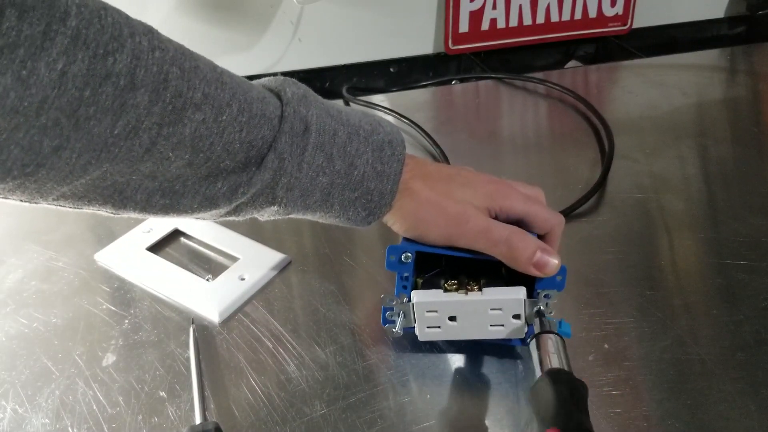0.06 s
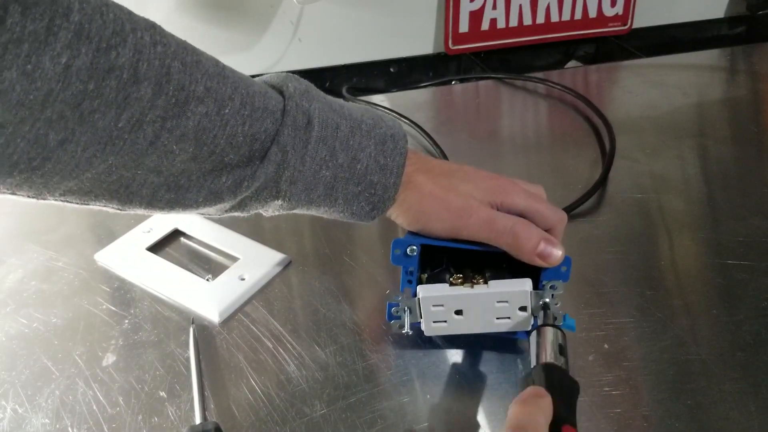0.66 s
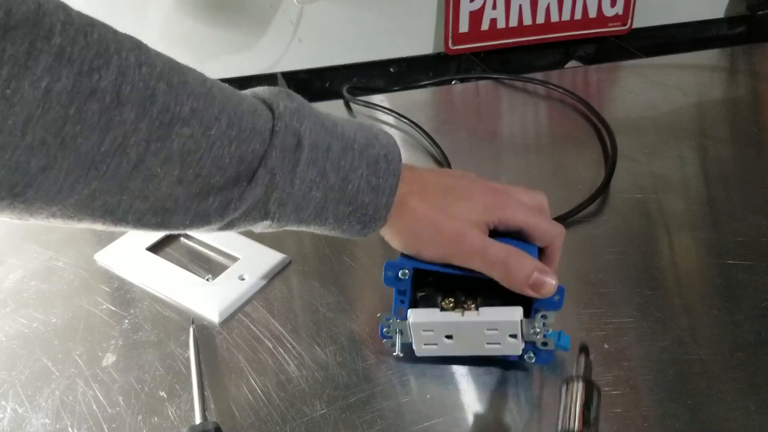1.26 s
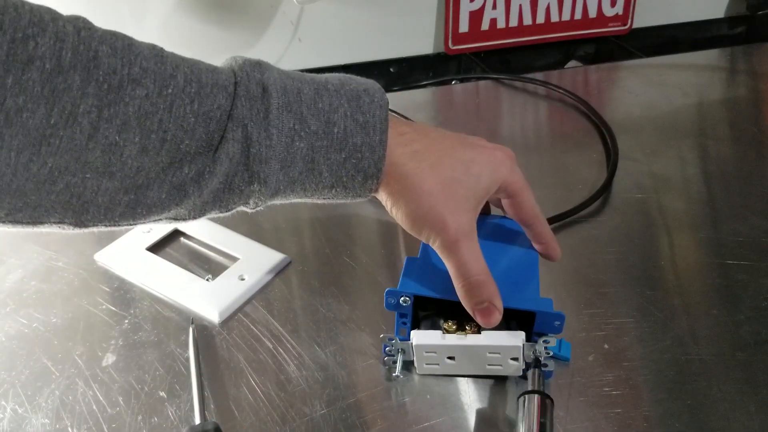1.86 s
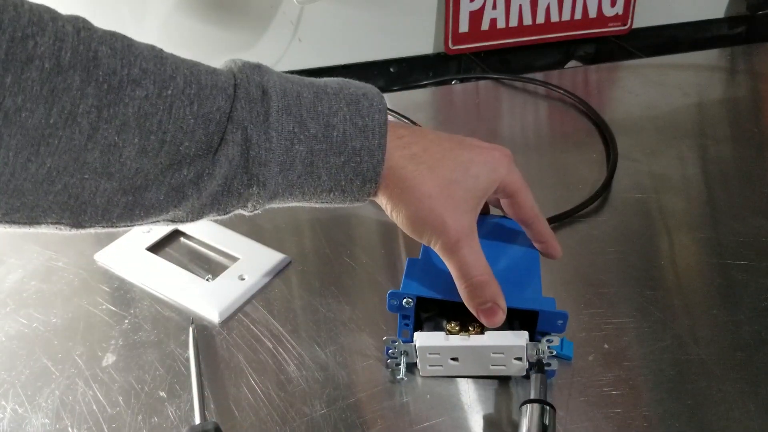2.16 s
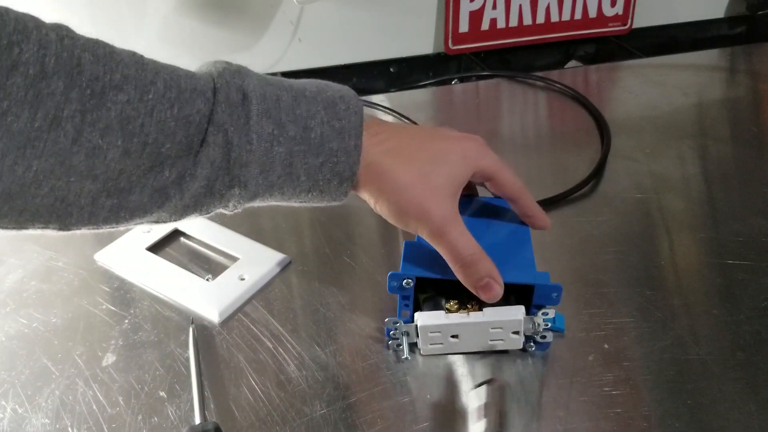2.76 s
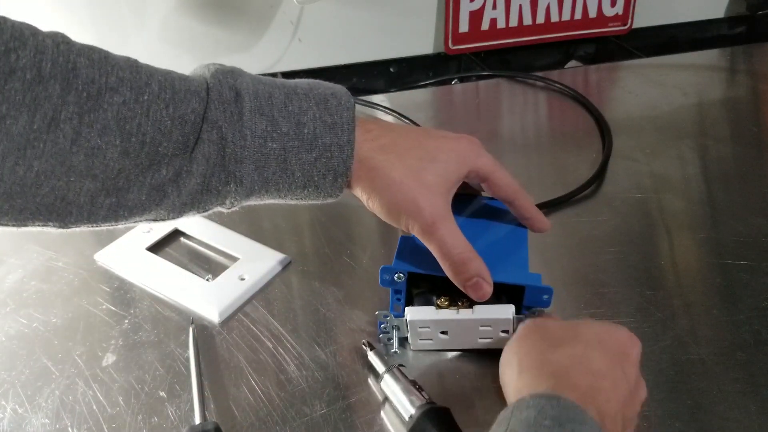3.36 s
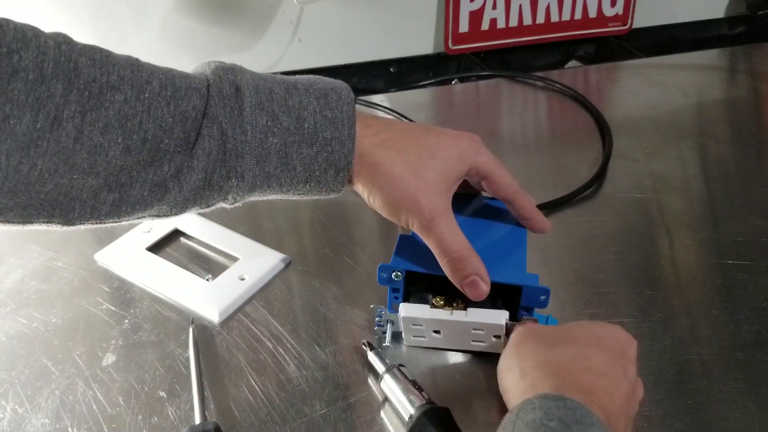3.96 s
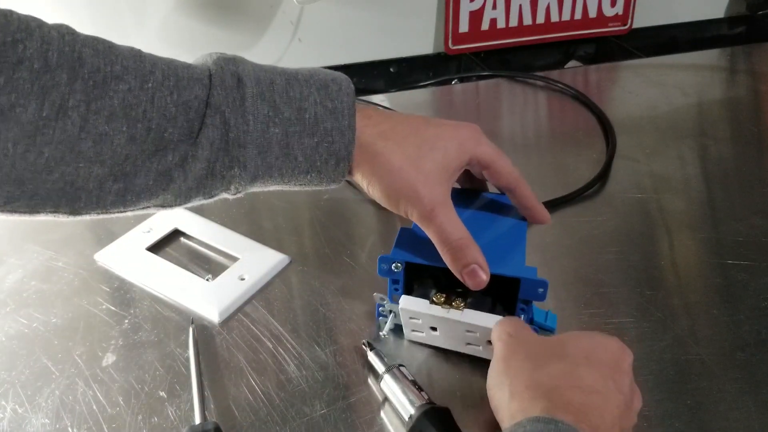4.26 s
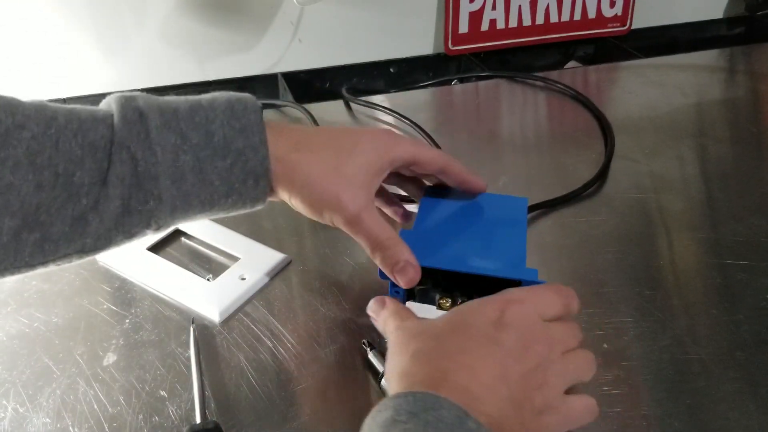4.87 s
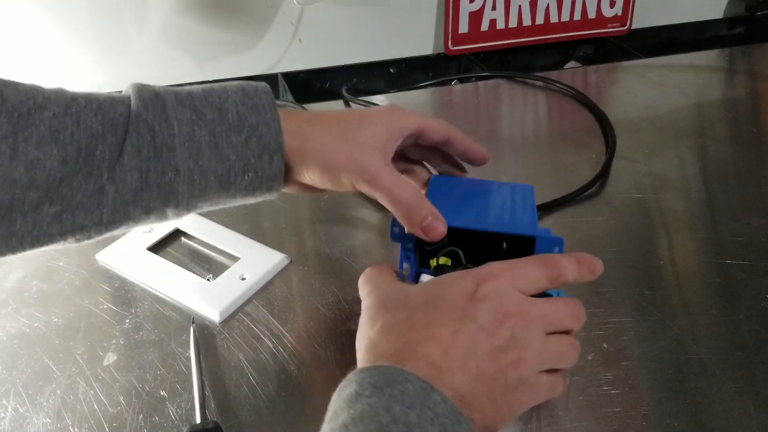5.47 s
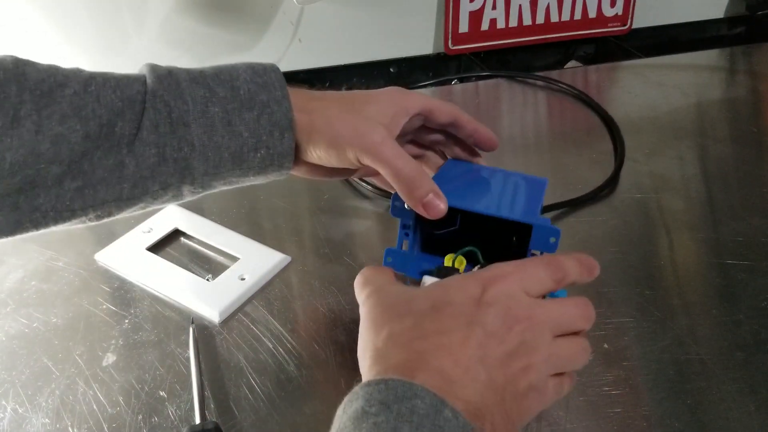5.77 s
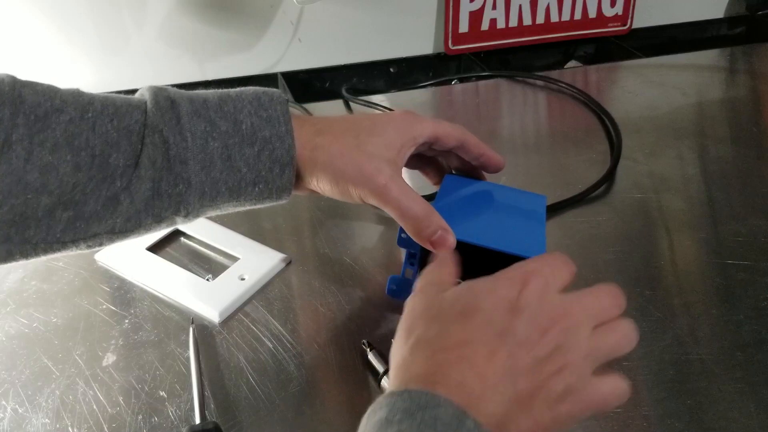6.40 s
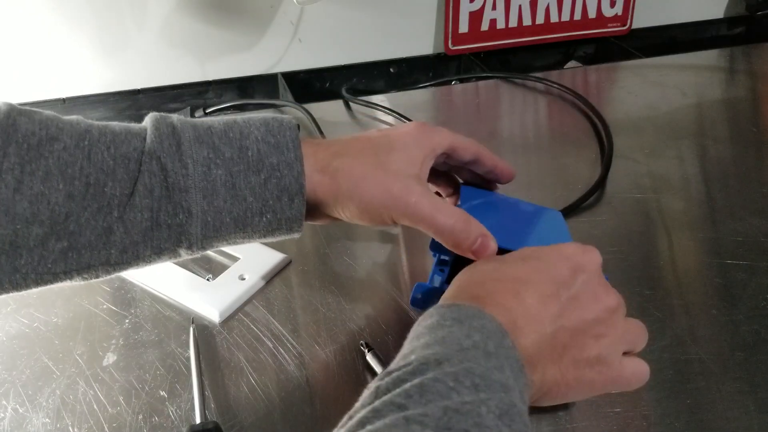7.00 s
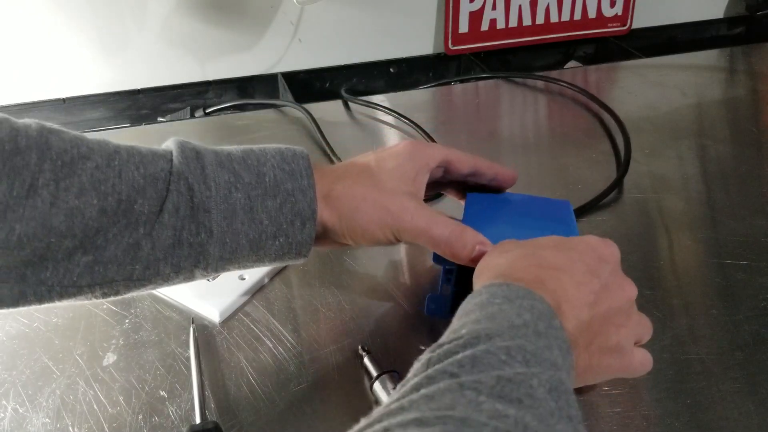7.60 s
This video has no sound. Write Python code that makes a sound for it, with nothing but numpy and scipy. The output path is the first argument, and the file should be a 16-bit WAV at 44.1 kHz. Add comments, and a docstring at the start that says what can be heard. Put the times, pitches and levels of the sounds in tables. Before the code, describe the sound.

Rapid, high-pitched screwdriver clicks give way to a metal clatter and scattered plastic snaps and knocks in a quiet workshop.

```python
"""First, in eightfold fast motion, a screwdriver backs the screws out of a wall outlet in a plastic box:
stick-slip friction makes ticks and squeaks, pitched up, while a motor drones briefly far off.
Then, at natural speed, a sleeve brushes past and the tool drops on the steel bench. Last, amid rubbing
hands and wires, the outlet is tugged, creaks and snaps out of its box. Throughout, each impact excites
the bench top, the hollow box and the hard parts, and the workshop reverberates."""
import sys
import numpy as np
from scipy import signal
from scipy.fft import rfft, irfft
from scipy.io import wavfile
from scipy.ndimage import uniform_filter1d

SR = 44100
rng = np.random.default_rng(int(sys.argv[2]) if len(sys.argv) > 2 else 0)


def digitize_waveform(pressure):
    """Quantize a signal to 16-bit integers and store it at the path in sys.argv[1].

    Rows of a 2-D input are taken as channels; values are limited to [-1, 1].
    """
    field = np.atleast_2d(pressure).T
    bounded = np.clip(field, -1, 1)
    quanta = np.round(bounded * 32767).astype(np.int16)
    wavfile.write(sys.argv[1], SR, quanta)


N = 336924
T = np.arange(N) / SR
FAST_SPEED, FAST_END_S = 8, 2.538
BOX_HZ = 850  # pitch of the box when nothing presses on its walls

# Levels are those before mixing; a column ending in _rel_db is relative to its row's level_db.
# twists of the screwdriver in fast motion: start_s, length_s, level_db, clack_rel_db
TWISTS = [(.02, 0.0032, -32, -11), (0.03, 0.021, -31.5, 0), (0.09, 0.037, -30.5, -12),
          (0.137, 0.00059, -16, -29), (0.171, 0.03, -32, -6), (0.2, 0.0037, -25, -16.5),
          (.2383, .005, -19.5, -25), (0.2655, 0.0029, -27.5, -12), (0.307, 0.022, -29.5, -8),
          (.382, 0.025, -24.5, -15), (0.4596, 0.0071, -24, -13), (0.4933, 0.0051, -33, -7),
          (.551, .038, -31.5, -7.5), (0.627, .007, -26, -23), (0.675, 0.0018, -33, -15),
          (0.718, .03, -31, -17), (0.755, 0.00292, -30.5, -18), (.796, 0.019, -26.5, -18),
          (0.834, .01, -39, -13), (0.8486, 0.00092, -16, -15), (0.882, 0.021, -35, -5),
          (0.917, 0.0019, -31.5, -10), (0.9527, 0.032, -32.5, -3.5), (1.032, .02, -27.5, -0.5),
          (1.064, 0.00287, -34, -16), (1.102, 0.01, -30, -12), (1.163, .003, -36, -1),
          (1.272, .024, -32.5, -7.5), (1.3617, 0.0028, -29, -6), (1.379, 0.0146, -41, -8),
          (1.415, 0.00465, -28.5, -6), (1.4967, 0.0056, -38, -8), (1.5623, .003, -34, -36),
          (1.597, 0.0045, -32, -16.5), (1.631, .04, -33.5, -13.5), (1.744, 0.021, -37, -6),
          (1.779, 0.0013, -34.5, -12.5), (1.806, 0.02966, -33.5, -12), (1.8661, 0.03, -30, -10),
          (1.92, .036, -31, -11), (1.9765, 0.025, -29, -13), (2.026, 0.03244, -28.5, -12.5),
          (2.0812, 0.0064, -27.5, -12), (2.132, 0.0094, -29, -20), (2.1698, .052, -33.5, -14),
          (2.3172, 0.00534, -35.5, -9), (2.3686, 0.024, -32, -17.5), (2.4731, .016, -28, -6),
          (2.494, 0.0063, -20, -12.5)]
# coupling to the bench as the box is pressed on it: time_s, bench_gain_db
BENCH_COUPLING = [(0, -8), (.55, -5.5), (1.15, -4.5), (1.28, -2), (1.38, 2), (1.55, -1), (1.8, -2),
                  (2.38, -7), (2.47, -1), (2.5, 4.5)]
# the thread squeaks in the plastic, in fast motion: start_s, pitch_hz, level_db, length_s
THREAD_SQUEAKS = [(.1, 9200, -32.5, 0.0076), (.1065, 8110, -25, 0.0024), (0.546, 8363, -33.5, 0.00672),
                  (0.569, 7925, -36, 0.0074), (1.74, 7500, -34.5, 0.0035), (1.753, 7450, -33, 0.0038),
                  (1.917, 7940, -31.5, 0.007)]
# soft bumps of the hands in fast motion: start_s, level_db, centre_hz, decay_s, width_ratio
HAND_BUMPS = [(1.388, -40.5, 1689, 0.016, 1.4), (1.597, -46.5, 429.4, 0.044, 0.29),
              (1.598, -39, 1207, 0.0145, 0.99)]
# tool or box lands on the bench: start_s, chatter_s, level_db, clack_rel_db
LANDINGS = [(2.891, 0.017, -50.5, 1), (2.921, 0.023, -43.5, 2.5), (2.9553, 0.01, -29.5, -8.5),
            (3.014, 0.012, -38, -5.5), (3.036, 0.0044, -30, -7.5), (3.1275, 0.00695, -17.5, -21),
            (3.1445, 0.0065, -24.5, -19), (3.171, 0.0022, -25.5, -16.5), (3.1803, 0.011, -26, -13.5),
            (4.047, 0.0049, -55.5, 0.5), (4.399, 0.0032, -44, -13), (4.583, 0.017, -37, 6),
            (5.145, 0.0072, -48, -1.5), (6.365, .014, -32, -3), (7.232, .013, -25, -33.5),
            (7.397, 0.0087, -33.5, -21), (7.411, .012, -31.5, -41), (7.549, 0.014, -30, -34),
            (7.607, .016, -42, -8)]
# the outlet's hard parts catch and snap free: start_s, chatter_s, level_db, tick_rel_db, box_rel_db
OUTLET_SNAPS = [(3.453, 0.0053, -40.5, -10, -5), (3.479, 0.00123, -45.5, 0.5, -6.5),
                (3.517, 0.0085, -44.5, -11, 1.5), (3.823, .02, -35.5, -22, -4.5),
                (3.849, 0.0017, -24, -5, -1.5), (4.112, .021, -34.5, -12, -5),
                (4.177, 0.016, -39.5, -9, -1), (4.2167, 0.0014, -39, -1.5, -8.5),
                (4.521, .0023, -22.5, -12.5, -8), (4.529, 0.0053, -29.5, -5.5, -1.5),
                (5.025, .006, -38, -7.5, -2), (5.071, 0.0084, -48, -8, -8), (5.102, 0.0057, -40, -12.5, -2),
                (6.2676, 0.0062, -47, -7.5, -13), (6.2937, 0.0025, -20.5, -9.5, -8),
                (6.3144, 0.0009, -21, -24, 0), (6.321, 0.0032, -28.5, -5, 2.5),
                (6.338, .016, -33.5, -2.5, 2), (6.8375, 0.0056, -31.5, -4.5, 0),
                (6.868, 0.031, -34, -9, 3.5), (7.045, 0.011, -38.5, -15.5, -3.5),
                (7.078, 0.03, -40.5, -11, 3.5), (7.198, 0.017, -41.5, -5, 6.5),
                (7.498, 0.02, -45.5, -8.5, 6)]
# fingers and wires tap the lifted box: start_s, chatter_s, pitch_hz, level_db, clack_rel_db
BOX_TAPS = [(2.771, 0.0274, 930, -55.5, -12), (3.7232, 0.0094, 980, -39.5, -2.5),
            (4.142, 0.0041, 880, -37.5, -14), (4.363, 0.023, 746, -47.5, -3.5),
            (5.5006, .004, 910, -32.5, -12), (5.622, .0066, 990, -40, -2), (5.852, 0.011, 987, -46.5, -4.5),
            (6.092, .012, 836, -44, -16), (6.659, 0.0054, 830, -43.5, -13), (6.808, .015, 910, -39.5, -2.5)]
# the outlet squeaks against the box: start_s, pitch_hz, level_db, length_s
OUTLET_CREAKS = [(3.724, 968, -35.5, .011), (6.6105, 955, -36.5, 0.0084), (6.779, 919, -32, 0.0072),
                 (6.807, 954, -45, 0.0075), (6.8285, 941.5, -29, .009)]
# friction of hands and wires, and of a passing sleeve: time_s, level_db
HAND_LEVELS = [(2.6, -69), (3.6, -61.5), (4.3, -55), (4.95, -60), (5.95, -71), (6.7, -62), (7.6, -62.5)]
SLEEVE_LEVELS = [(2.74, -81), (2.8, -64.5), (2.89, -62.5), (2.96, -77.5)]
# modes of the steel bench top at natural speed: pitch_hz, level_db, t60_s (capped in bench_ring)
BENCH_MODES = [(103, -16, 0.72), (196.3, -6, 1), (312.5, -4.5, 0.65), (352.03, -1.5, 0.19),
               (389.2, -4, 0.35), (439, -7, 0.53), (511.4, -8, 0.94), (575, -12, 0.64), (628, -11.5, 0.98)]
# modes of the hollow plastic box: pitch_ratio, level_db
BOX_MODES = [(1, 6), (1.65, -9), (3.199, -19.5)]
# spectra of the bench's thud and the hard parts' clack and tick at natural speed: frequency_hz, level_db
THUD_SPECTRUM = [(20, -39.5), (98, -3), (140, -13), (270, -13), (325, -8), (460, 0.5), (650, -6.5),
                 (900, -13), (2000, -61)]
CLACK_SPECTRUM = [(800, -30), (1400, -3), (2400, 0.5), (4200, 5), (5800, -2.5), (8500, -23)]
TICK_SPECTRUM = [(4500, -15), (7000, 5), (9500, -2.5), (13000, -7), (16000, -25)]
# reverberation time of the workshop at natural speed: frequency_hz, t60_s
ROOM_T60 = [(100, 0.96), (260, 0.81), (700, 0.55), (1840, 0.75), (4850, 0.55), (12800, 0.351)]
# distant motor as heard in fast motion: time_s, pitch_hz, level_db
MOTOR_DRONE = [(.68, 757.7, -64), (.95, 713, -72), (1.149, 698, -72), (1.3, 712.6, -59), (1.45, 737, -58)]
# spectra of the still air as heard in fast motion and at natural speed: frequency_hz, density_db
FAST_AIR_SPECTRUM = [(30, -16.5), (140, -15), (220, -1.5), (400, 3), (800, 0), (1500, -9.5), (4000, -13),
                     (16000, -20)]
AIR_SPECTRUM = [(20, -5.5), (45, -1.5), (120, -4.5), (250, -17), (900, -27.5), (1800, -24.5), (4000, -37),
                (9000, -42), (16000, -35.5)]


def unscrewing():
    """Friction in fast motion: the blade ticks in the slot, the thread squeaks and grinds in the plastic."""
    dry = squeaks(THREAD_SQUEAKS, jitter_rad=.063)
    dry += contacts(slips() + regrips(), FAST_SPEED, box_width_hz=320, ring_db=-24.5, clack_db_per_oct=-9,
                    thud_s=.0082, box_s=.0061, clack_s=.0076)
    grit = rubbing([(300, -19.5), (800, -.5), (2200, -12), (3500, -.5), (5400, -7), (8000, 11),
                    (10500, -23.5), (16000, -9)], grain_db=13, grain_s=.0017)
    dry += undb(-54) * (turning() + .082) * grit
    room = undb(-7) * workshop(dry, FAST_SPEED, bass_db=9, hop_s=.04)
    return undb(-3.5) * dry + room + bumps() + motor() + air(FAST_AIR_SPECTRUM, -63)


def handling():
    """Impact and friction at natural speed: the tool lands, the outlet snaps free, hands and wires rub."""
    dry = contacts(landings() + snaps(), speed=1, box_width_hz=450, ring_db=-20, clack_db_per_oct=3,
                   thud_s=.0074, box_s=.0051, clack_s=.0041)
    # off the bench the box rings more freely
    dry += contacts(taps(), speed=1, box_width_hz=213, ring_db=-22, clack_db_per_oct=-1,
                    thud_s=.007, box_s=.0041, clack_s=.0044, box_db_per_oct=10)
    dry += squeaks(OUTLET_CREAKS, jitter_rad=.045)
    hands = rubbing([(100, -3), (400, -6.5), (900, 8), (1800, -11), (4200, -.5), (8000, -17),
                     (16000, -26)], grain_db=6, grain_s=.013)
    sleeve = rubbing([(1000, -19), (5500, -13), (7600, -2), (9500, -18), (12500, -5.5), (16000, -27)],
                     grain_db=-1, grain_s=.012)
    dry += gain_curve(HAND_LEVELS) * hands + gain_curve(SLEEVE_LEVELS) * sleeve
    room = undb(-8) * workshop(dry, speed=1, bass_db=-.5, hop_s=.015)
    return undb(-4) * dry + room + air(AIR_SPECTRUM, -66.5)


def slips(gap_s=.0105, max_chatter_s=.0045, later_db=-4.5, scatter_db=3, max_count=6):
    """Stick-slip: the blade catches as each twist starts; lighter slips follow unevenly while it lasts."""
    rows = []
    for at_s, length_s, db, clack_rel_db in TWISTS:
        coupling_db = np.interp(at_s, *np.transpose(BENCH_COUPLING))
        for k, (late, size, grip, edge) in enumerate(rng.standard_normal((max_count, 4))):
            if k * gap_s < length_s:
                follows = k > 0
                start_s = at_s + gap_s * (k + .16 * late * follows)
                chatter_s = min(length_s, max_chatter_s)
                box_hz = 970 * (1 + .085 * grip)  # the grip shifts the box pitch
                box_db = db + follows * (later_db + scatter_db * size)
                clack_db = box_db + clack_rel_db + 2.8 * edge * follows
                rows.append((start_s, chatter_s, box_hz, box_db + coupling_db, box_db, clack_db))
    return rows


def landings(box_db=4, box_per_clack=.24, tick_db=-12):
    """Impact drives the bench; the harder it clacks, the more the box joins in."""
    return [(at_s, chatter_s, BOX_HZ, db, db + box_db + box_per_clack * clack_db,
             db + clack_db, db + clack_db + tick_db) for at_s, chatter_s, db, clack_db in LANDINGS]


def snaps(bench_db=-7.5):
    """Sudden release excites the hard parts; the vibration reaches the bench through the box."""
    return [(at_s, chatter_s, BOX_HZ, db + box_db + bench_db, db + box_db, db, db + tick_db)
            for at_s, chatter_s, db, tick_db, box_db in OUTLET_SNAPS]


def taps(bench_db=-11, tick_db=-26):
    """Weak coupling: a tap sounds the lifted box and barely stirs the bench."""
    return [(at_s, chatter_s, box_hz, db + bench_db, db, db + clack_db, db + tick_db)
            for at_s, chatter_s, box_hz, db, clack_db in BOX_TAPS]


def regrips(span_s=(1.7, 2.42), level_db=-46, box_db=-.5, clack_db=-9, chatter_s=.007, count=22):
    """Light, irregular impacts as the hands shift on box and tool."""
    rows = []
    for k, (late, size) in enumerate(rng.standard_normal((count, 2))):
        at_s = np.interp(k + .45 * late, [0, count], span_s)
        db = level_db + 2.5 * size
        rows.append((at_s, chatter_s, BOX_HZ, db, db + box_db, db + clack_db))
    return rows


def contacts(rows, speed, box_width_hz, ring_db, clack_db_per_oct, thud_s, box_s, clack_s,
             box_db_per_oct=0):
    """Source and filter: each impact is a chattering noise burst shaped by bench, box and hard parts."""
    # rows: start_s, chatter_s, box_hz, bench_db, box_db, clack_db and optionally tick_db
    # speed multiplies the frequencies and divides the decay times thud_s, box_s and clack_s
    n = 8192 // speed
    t, hz = np.arange(n) / SR, freqs(n) / speed
    bench, parts = np.zeros((2, 2, N))
    treble_octaves = np.log2(np.maximum(hz / 1200, 1))
    burst_gain = np.sqrt(SR / 100 / speed / n)  # the energy of 10 ms / speed at rms 1
    for at_s, chatter_s, box_hz, *levels_db in rows:
        age_s, strength = chatter(t, chatter_s)
        bench_db, clack_db = levels_db[0], levels_db[2]
        # a soft contact, with little tick in it, also gives a duller clack
        tilt_db = clack_db_per_oct + .36 * min(levels_db[-1] - clack_db + 11.5, 0)
        # a cushioned blow, with little clack, pushes longer and gives the bench more bass
        bass_db = np.clip(.35 * (bench_db - clack_db - 35.5), -4, 4) / (1 + (hz / 200) ** 4)
        bodies = [(bench, on_log_axis(THUD_SPECTRUM, hz) + bass_db, thud_s, .28),
                  (parts, box_spectrum(hz, box_hz, box_width_hz, box_db_per_oct), box_s, .6),
                  (parts, on_log_axis(CLACK_SPECTRUM, hz) + tilt_db * treble_octaves, clack_s, .65),
                  (parts, on_log_axis(TICK_SPECTRUM, hz), .0022, .65)]
        for db, (bus, spectrum_db, decay_s, side_ratio) in zip(levels_db, bodies):
            touches = strength * np.exp(-age_s * speed / decay_s)
            force = np.sqrt(np.sum(touches ** 2, axis=0))  # incoherent touches add in power
            burst = colour(force * noise(n, side_ratio), spectrum_db)
            add(bus, at_s, undb(db) * unit(burst) * burst_gain)
    return parts + bench + undb(ring_db) * convolve(bench, bench_ring(speed))


def chatter(t, chatter_s, scatter_db=.5, later_db=-4, count=4):
    """Rebound: lighter touches follow the first, about half of chatter_s apart; gives age and strength."""
    starts = np.arange(count) + rng.uniform(-.44, .4, count)
    starts[0] = 0
    strength = undb(scatter_db * rng.standard_normal(count) + later_db * (starts > 0))
    age_s = t - starts[:, None] * chatter_s * .48
    return np.maximum(age_s, 0), strength[:, None] * (age_s >= 0)


def box_spectrum(hz, pitch_hz, width_hz, db_per_oct):
    """Modal response of the hollow box in dB: the strongest resonance rules at each frequency."""
    modes = [db + db_per_oct * np.log2(ratio) + 2 * resonance(hz, ratio * pitch_hz, width_hz)
             for ratio, db in BOX_MODES]
    return np.max(modes, axis=0)


def bench_ring(speed, max_t60_s=.5):
    """The steel bench top rings in decaying modes, each dying within half a second; unit energy."""
    t = np.arange(int(SR / speed)) * speed / SR
    modes = sum(undb(db) * np.cos(2 * np.pi * hz * t) * 1000 ** (-t / min(t60_s, max_t60_s))
                for hz, db, t60_s in BENCH_MODES)
    return unit(modes)[None] / np.sqrt(len(t))


def squeaks(rows, jitter_rad):
    """Self-excited oscillation: plastic sticks and slips in step with the box resonance, nearly pure."""
    out = np.zeros((2, N))
    for at_s, hz, db, length_s in rows:
        n = int(length_s * SR)
        phase = np.cumsum(2 * np.pi * hz / SR + jitter_rad * rng.standard_normal(n))
        add(out, at_s, undb(db) * unit(np.hanning(n) * np.sin(phase))[None])
    return out


def rubbing(spectrum, grain_db, grain_s):
    """Sliding friction: a hiss that catches unevenly, rms 1; spectrum lists frequency_hz, level_db."""
    catch = undb(grain_db * wander(grain_s))
    return unit(colour(catch * noise(N, .68), on_log_axis(spectrum, freqs(N))))


def turning(run_on_s=.017):
    """Friction follows motion: a smoothed gate, open through each twist and a moment after it."""
    moving = np.zeros(N)
    for at_s, length_s, *_ in TWISTS:
        moving[int(at_s * SR):int((at_s + length_s + run_on_s) * SR)] = 1
    return uniform_filter1d(moving, size=160)


def bumps():
    """Damped resonance: the bench answers each soft push of the hands with a fading band of noise."""
    out, n = np.zeros((2, N)), SR // 5
    for at_s, db, centre_hz, decay_s, width_ratio in HAND_BUMPS:
        push = colour(noise(n, .106), 2 * resonance(freqs(n), centre_hz, width_ratio * centre_hz))
        add(out, at_s, undb(db) * unit(push) * np.exp(-np.arange(n) / SR / decay_s))
    return out


def workshop(x, speed, bass_db, hop_s, count=5):
    """Reverberation depends on position: as hands and parts move, touches meet different reflections."""
    place = T * speed / hop_s
    out = 0
    for k in range(count):
        offset = (place - k + count / 2) % count - count / 2
        crossfade = np.cos(np.pi / 2 * np.minimum(abs(offset), 1))
        out = out + convolve(x * crossfade, room_tail(speed, bass_db))
    return out


def room_tail(speed, bass_db, build_s=.00045):
    """Diffuse field, unit energy: bands decay exponentially; bass lasts longest, alike in both ears."""
    n = 49152 // speed
    t, hz = np.arange(n) * speed / SR, freqs(n) / speed
    mid, side = rfft(rng.standard_normal((2, n)))
    spread = np.minimum(hz / 750, 1)
    field = mid + np.array([[1], [-1]]) * side * spread
    edges_hz = np.r_[0, np.geomspace(150, SR, 12)]
    tail = 0
    for low_hz, high_hz in zip(edges_hz, edges_hz[1:]):
        centre_hz = (low_hz + high_hz) / 2
        band = irfft(field * ((hz >= low_hz) & (hz < high_hz)), n)
        gain = undb(bass_db / (1 + (centre_hz / 700) ** 2))
        tail = tail + gain * band * 1000 ** (-t / on_log_axis(ROOM_T60, centre_hz))
    return unit(tail * (1 - np.exp(-t / build_s))) / np.sqrt(n)


def motor(fade_s=.035):
    """Periodic vibration of a far motor: one tone, drifting in pitch and wavering in level."""
    time_s, hz, db = np.transpose(MOTOR_DRONE)
    fade = np.clip(np.minimum(T - time_s[0], time_s[-1] - T) / fade_s, 0, 1)
    level_db = np.interp(T, time_s, db) + 2 * wander(step_s=.03)
    phase = 2 * np.pi * np.cumsum(np.interp(T, time_s, hz)) / SR
    return fade * undb(level_db) * unit(np.sin(phase))


def air(spectrum, db):
    """Stationary noise: the quiet of the workshop."""
    return undb(db) * unit(colour(noise(N, .13), on_log_axis(spectrum, freqs(N))))


def colour(x, db):
    """Minimum-phase filter with the given dB on each frequency bin."""
    n = x.shape[-1]
    cepstrum = irfft(np.log(undb(db)), n)
    cepstrum[1:n // 2] *= 2
    cepstrum[n // 2 + 1:] = 0
    return irfft(rfft(x) * np.exp(rfft(cepstrum)), n)


def resonance(hz, centre_hz, width_hz):
    """Response of a damped oscillator in dB."""
    hz = np.maximum(hz, 1)
    return -10 * np.log10(1 + ((hz ** 2 - centre_hz ** 2) / (hz * width_hz)) ** 2)


def noise(n, side_ratio):
    """Partly correlated stereo noise with a given side-to-mid ratio."""
    mid, side = rng.standard_normal((2, n))
    return np.array([mid + side_ratio * side, mid - side_ratio * side])


def wander(step_s):
    """Random modulation: Gaussian values joined by straight lines."""
    knots_s = np.arange(0, T[-1], step_s)
    return np.interp(T, knots_s, rng.standard_normal(len(knots_s)))


def on_log_axis(points, hz):
    """Interpolate (frequency_hz, value) points over log frequency."""
    points_hz, value = np.transpose(points)
    return np.interp(np.log(np.maximum(hz, 1)), np.log(points_hz), value)


def gain_curve(points):
    return undb(np.interp(T, *np.transpose(points)))


def undb(db):
    return 10 ** (np.asarray(db) / 20)


def unit(x):
    """Scale to rms 1."""
    return x / np.sqrt(np.mean(x ** 2) + 1e-30)


def freqs(n):
    return np.fft.rfftfreq(n, 1 / SR)


def add(bus, at_s, x):
    start = max(int(at_s * SR), 0)
    bus[:, start:start + x.shape[1]] += x[:, :N - start]


def convolve(x, response):
    return signal.fftconvolve(x, response, axes=-1)[:, :N]


def scene():
    """Unscrewing, then handling; a level difference between the ears sets both slightly to the left."""
    fast = T < FAST_END_S
    balance_db = np.where(fast, .5, 1.6)
    return np.where(fast, unscrewing(), handling()) * undb(np.array([[.5], [-.5]]) * balance_db)


def record(dry):
    """Band limiting: a steep low-pass filter removes the highest treble."""
    cutoff_hz = 15900
    return signal.sosfilt(signal.ellip(10, .2, 75, cutoff_hz, fs=SR, output="sos"), dry)


dry = scene()
out = record(dry)
digitize_waveform(out)
```